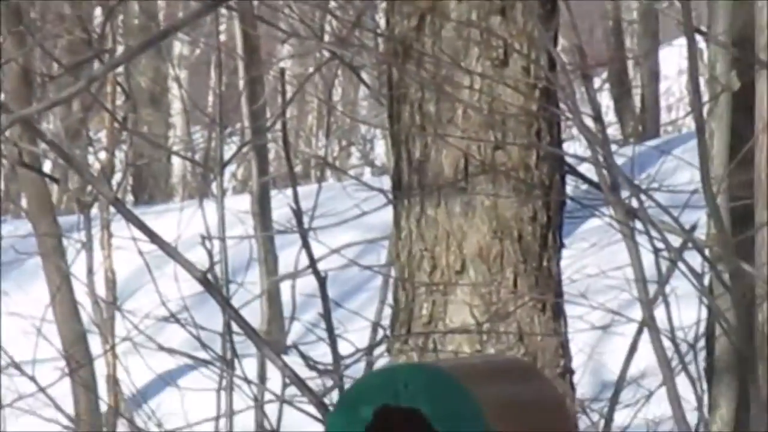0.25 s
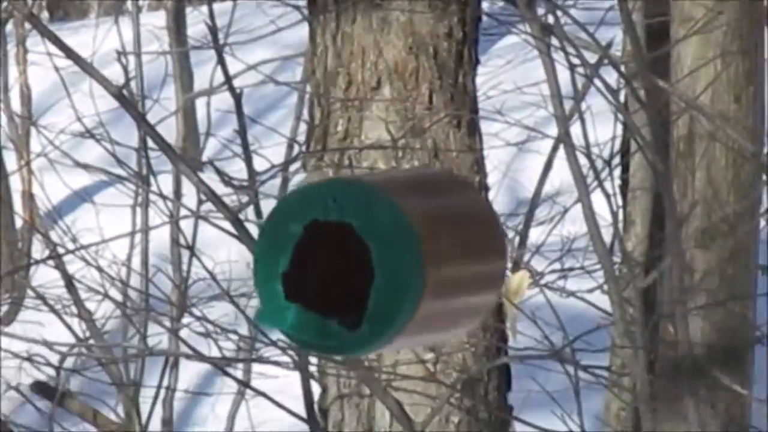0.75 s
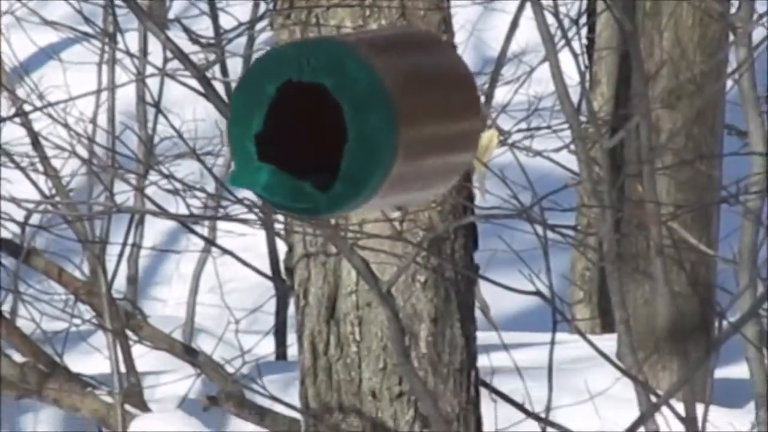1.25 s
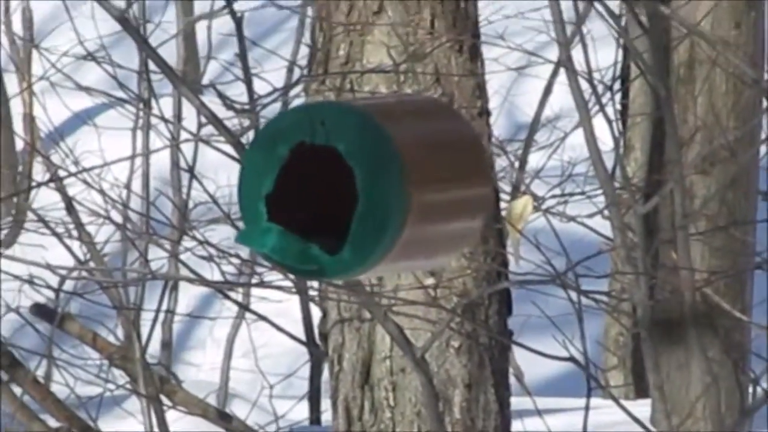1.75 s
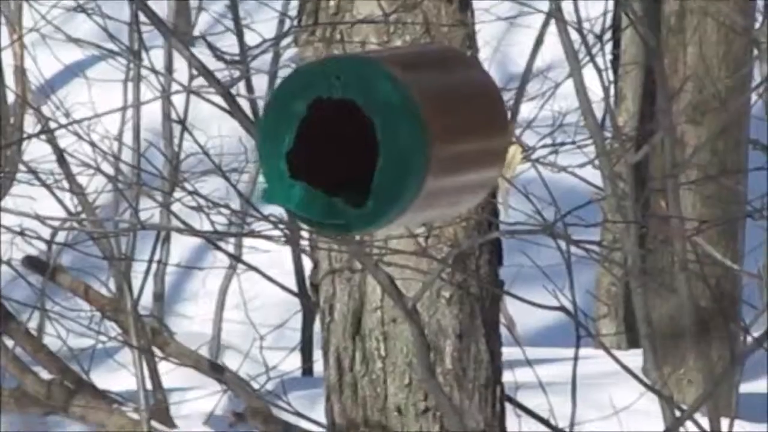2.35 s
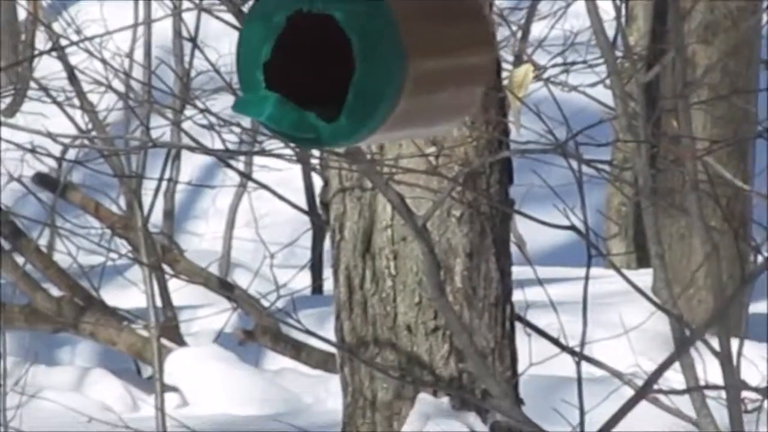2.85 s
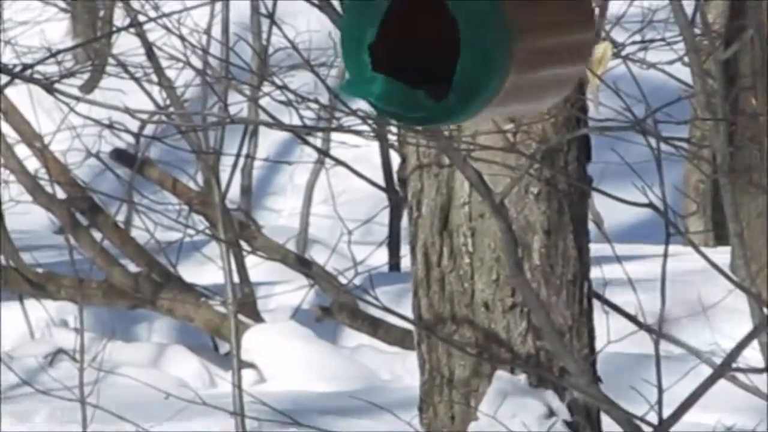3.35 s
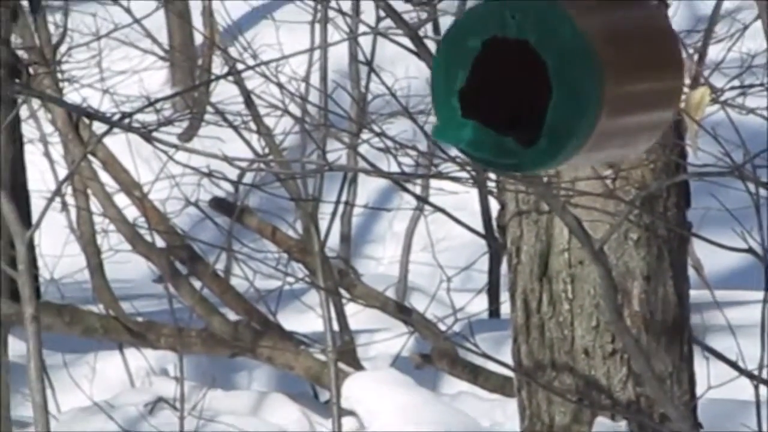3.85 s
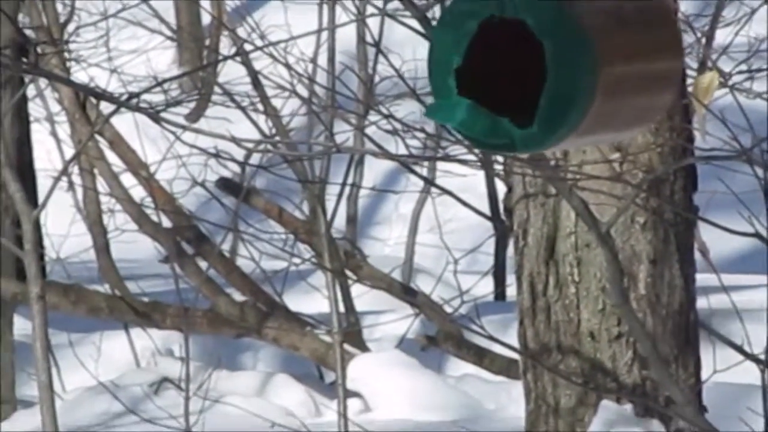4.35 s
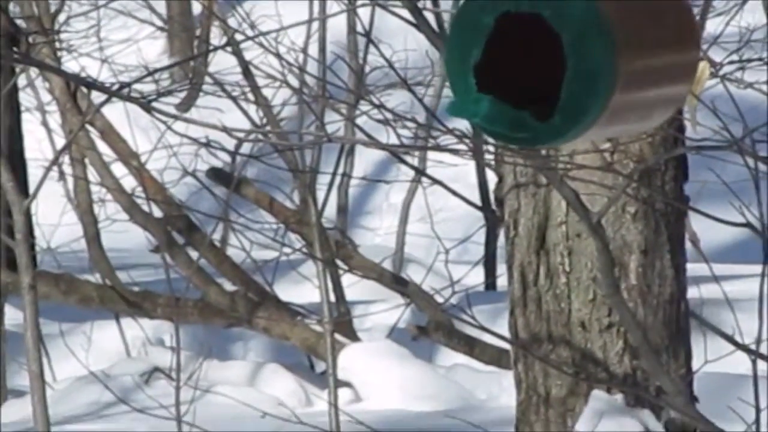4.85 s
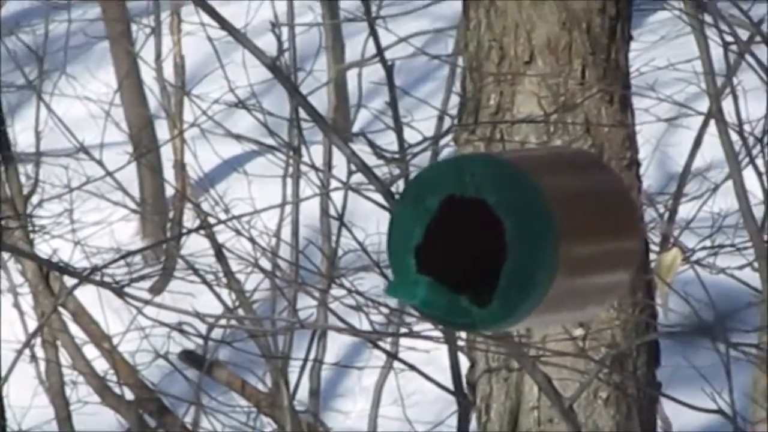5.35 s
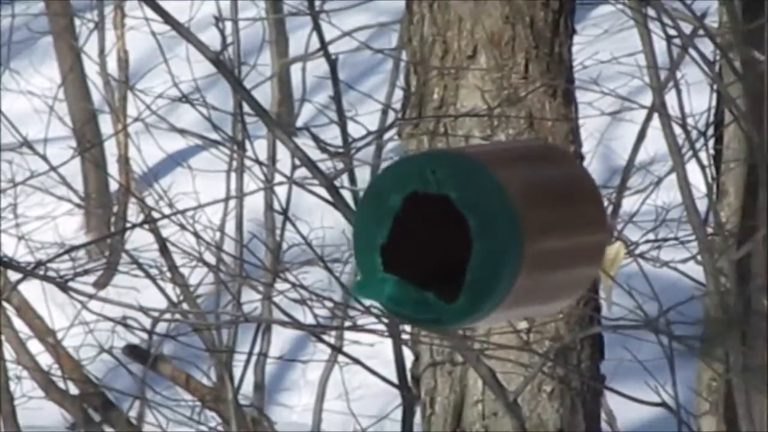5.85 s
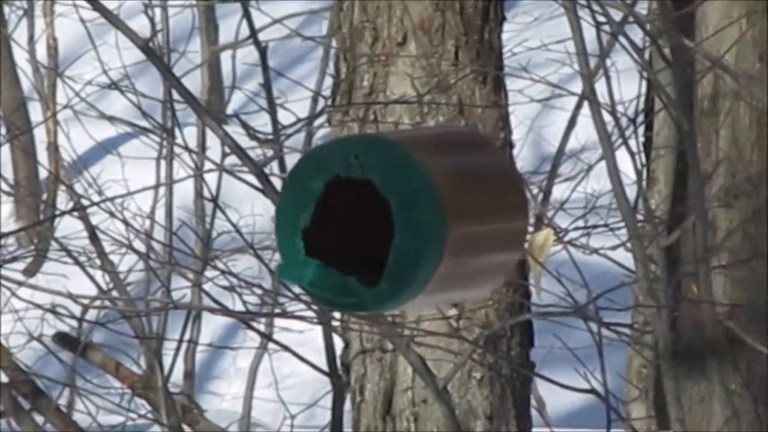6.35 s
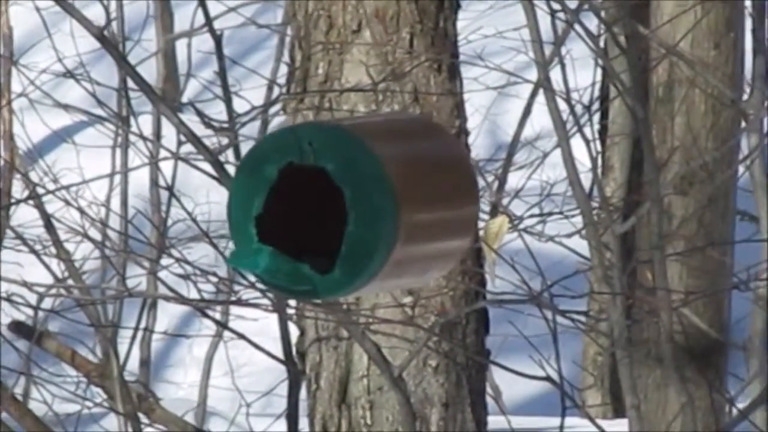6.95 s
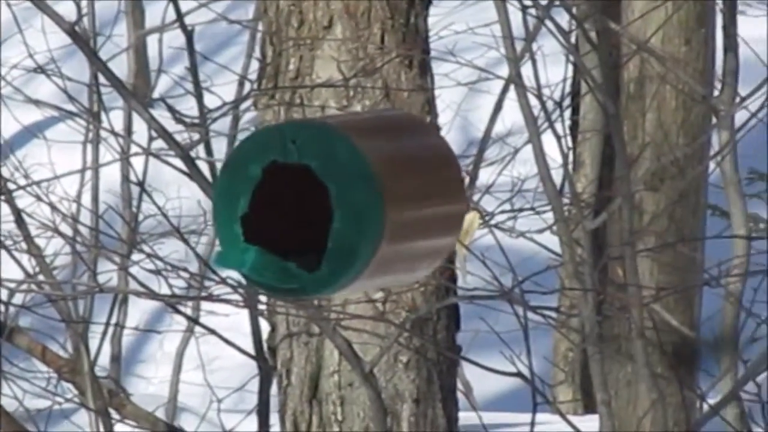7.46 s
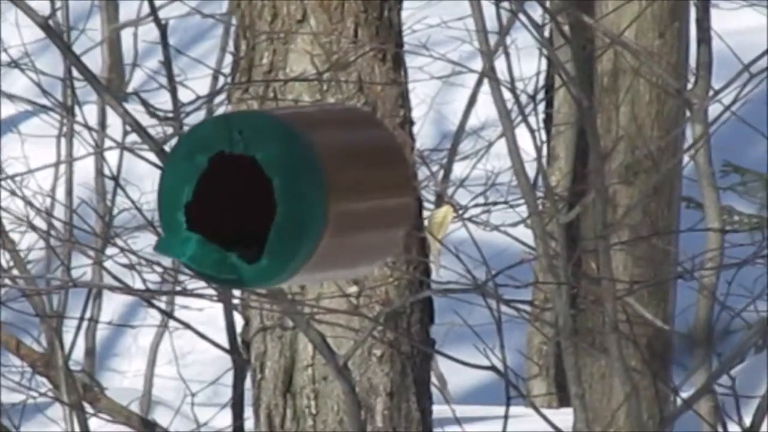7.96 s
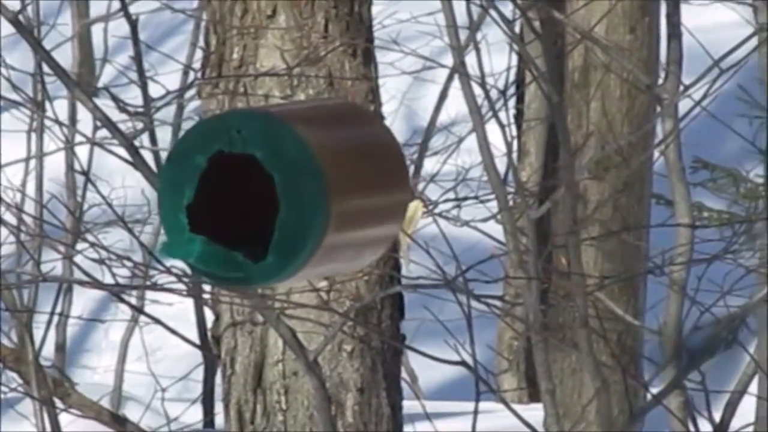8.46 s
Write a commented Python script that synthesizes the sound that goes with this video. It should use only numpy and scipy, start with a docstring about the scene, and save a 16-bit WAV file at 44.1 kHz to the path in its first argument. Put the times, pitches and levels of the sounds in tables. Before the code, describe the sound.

Close chickadees call in snowy bare woods. Six harsh rasps come quickly, then dry ticks among twigs and two weaker rasps. A thin high whistle leads into four more rasps. After faint distant chips, eight louder, cleaner buzzy dee notes follow at an even pace. Soft low hiss and small puffs of air on the microphone lie beneath, with short woody echoes.

```python
"""Chickadees in snowy woods

Harsh scolding rasps with one thin whistle among them, then a run of eight buzzy 'dee' notes.
Each note is a rising sum of wavering partials with a beak resonance; trunks scatter it. Birds further off are faint.
Dry ticks sound among the twigs; under all lie a hiss, a faint drone, a far rush and soft buffets of air."""
import sys
import numpy as np
from scipy import signal
from scipy.fft import rfft, irfft, next_fast_len
from scipy.io import wavfile

SR = 44100
rng = np.random.default_rng(int(sys.argv[2]) if len(sys.argv) > 2 else 0)


def pcm_store(signal):
    """Save signal as 16-bit PCM."""
    levels = np.round(np.clip(np.atleast_2d(signal), -1, 1) * 32767)
    wavfile.write(sys.argv[1], SR, levels.astype(np.int16).T)


N = 383669
TIME_S = np.arange(N) / SR
TOP_HZ = 15100  # highest partial and final cut

# partials of the dee voice: (multiple of the buzz rate, level [dB])
DEE_PARTIALS = [(4, -56.5), (5, -19), (6, -25.5), (7, -38), (9, -7), (10, -3.5), (11.5, -4.5),
                (13.3, -14.5), (15, -6.5), (18.5, 3), (22, -5), (26, -23.5), (31, -18), (42, -17.5)]


def undb(db):
    """Decibels to gain."""
    return 10 ** (np.asarray(db) / 20)


def unit(x):
    """Scale to rms 1."""
    return x / np.sqrt(np.mean(x ** 2))


def colour(x, points):
    """Filter by a spectrum of (frequency [Hz], level [dB]) points, joined on a log frequency axis."""
    points_hz, points_db = np.transpose(points)
    bins_hz = np.fft.rfftfreq(len(x), 1 / SR)
    gain = undb(np.interp(np.log(bins_hz + 1), np.log(points_hz), points_db))
    return irfft(rfft(x) * gain, len(x))


def resonate(x, hz, width_hz):
    """Two-pole resonance, gain 1 at the centre."""
    b, a = signal.iirpeak(hz, hz / width_hz, SR)
    return signal.lfilter(b, a, x)


def band_noise(hz, width_hz, size):
    """Noise through two equal resonances, rms 1."""
    once = resonate(rng.standard_normal(size), hz, width_hz)
    return unit(resonate(once, hz, width_hz))


def wander(rate_hz, size, count=512):
    """Normal random values at rate_hz, joined by lines."""
    return np.interp(np.arange(size) * rate_hz / SR, np.arange(count), rng.standard_normal(count))


def swells(rows):
    """Summed gain of bell-shaped swells, one per (peak [s], half width at 1/e [s], level [dB]) row."""
    return sum(undb(db) * np.exp(-((TIME_S - peak_s) / width_s) ** 2) for peak_s, width_s, db in rows)


def pan(x, pan_db):
    """Place a sound by its left minus right level."""
    return x * undb(np.array([[pan_db], [-pan_db]]) / 2)


def add(out, x, start_s):
    """Mix x into out from start_s, trimmed to fit."""
    i = int(start_s * SR)
    x = x[..., max(-i, 0):N - i]
    first = max(i, 0)
    out[..., first:first + x.shape[-1]] += x


def air_hiss():
    """Distant hiss: coloured noise whose level wavers slightly."""
    # hiss spectrum: (frequency [Hz], relative density [dB per Hz])
    hiss_spectrum = [(15, -36.5), (25, -10.5), (49, -17), (109, -17), (154, -3.5), (191, -5), (219, -2.5),
                     (326, -5.5), (363, -7), (588, -6), (1000, -13.5), (1240, -18), (2700, -29),
                     (6900, -35.5), (15000, -44)]
    level_db = -49.5 + .5 * wander(28, N)
    return undb(level_db) * unit(colour(rng.standard_normal(N), hiss_spectrum))


def air_buffets():
    """Air on the microphone: low noise in separate swells over a constant random stirring."""
    # buffets: (peak [s], half width at 1/e [s], level [dB])
    buffet_rows = [(.08, 0.018, -44), (.41, 0.032, -43.5), (.65, 0.014, -30.5), (.74, 0.047, -36),
                   (1.54, .015, -39), (3.3, 0.047, -35.5), (3.48, 0.032, -42), (3.75, 0.013, -29.5),
                   (3.85, 0.012, -32.5), (4.12, 0.022, -43.5), (4.41, 0.023, -44.5), (6.57, .025, -44),
                   (6.96, 0.074, -44), (7.95, .02, -41), (8.18, 0.056, -46), (8.66, .02, -45)]
    spectrum = [(15, -5.0), (40, -4), (90, -2.5), (170, -14.0), (400, -44.0), (2000, -67)]  # (Hz, dB)
    stir_db, stir_spread_db = -57.5, 3
    gust = swells(buffet_rows) + undb(stir_db + stir_spread_db * wander(9.1, N))
    return gust * unit(colour(rng.standard_normal(N), spectrum))


def far_drone():
    """Three narrow noise bands that throb at random; barely there, then up to a lasting level."""
    quiet_db, loud_db, rise_start_s, rise_length_s = -62.5, -52, 4.9, 0.13
    throb_db = 4.2 * wander(16, N)
    risen = np.clip((TIME_S - rise_start_s) / rise_length_s, 0, 1)
    level_db = quiet_db + (loud_db - quiet_db) * risen + throb_db
    bands = band_noise(162.3, 30, N)
    bands += undb(-10) * band_noise(228, 25, N)
    bands += undb(-9) * band_noise(335, 11.0, N)
    return undb(level_db) * bands


def far_rush():
    """Slow swells of mid-band noise."""
    # swells: (peak [s], half width at 1/e [s], level [dB])
    rush_rows = [(2.2, 0.51, -55), (7.9, 0.9, -52.5)]
    return swells(rush_rows) * band_noise(650, 400, N)


def background():
    """Hiss, buffets, drone and rush, equal in both ears, plus faint treble noise opposed between them."""
    mid = air_hiss() + air_buffets() + far_drone() + far_rush()
    side = undb(-75) * band_noise(6000, 8300, N)
    return mid + np.array([side, -side])


def ticks():
    """Dry clicks among the twigs: noise bands that die within milliseconds."""
    # ticks: (start [s], centre [Hz], level before decay [dB])
    tick_rows = [(1.588, 8400, -60), (1.707, 6710, -51), (2.474, 8060, -57), (2.57, 2770, -45),
                 (2.72, 6700, -51)]
    out, t = np.zeros(N), np.arange(SR // 30) / SR
    for start_s, hz, db in tick_rows:
        add(out, undb(db) * band_noise(hz, hz / 2, len(t)) * np.exp(-t / .003), start_s)
    return pan(out, 0)


def buzz(t, hz, rough, partials, low_db, jitter, wobble, chaos, count=44):
    """Two coupled membranes sound at multiples of their beat rate; rough coupling makes each partial waver alone."""
    size = len(t)
    unsteady = rough * (jitter * wander(300, size) + wobble * wander(45, size))
    cycles = np.cumsum(hz * (1 + unsteady)) / SR
    multiples, strengths_db = np.transpose(partials)
    voice = np.zeros(size)
    for k in range(2, count):
        top_hz = k * hz.max()
        db = np.interp(k, multiples, strengths_db) + low_db * np.clip(2 - top_hz / 2600, 0, 1)
        # low partials stay cleaner unless the note is harsh
        depth = chaos * rough * np.minimum(rough ** 2 + k / 15, 1)
        waver = wander(260, size) + 1j * wander(260, size)
        # partials out of step: each beat swells rather than clicks
        turn = np.exp(2j * np.pi * (k * cycles + .14 * rng.standard_normal()))
        voice += undb(db) * np.real(turn * (1 + depth * waver)) * (top_hz < TOP_HZ)
    return voice


def saturate(x):
    """The membranes swing only so far, which evens out the strongest beats."""
    x = unit(x)
    swing = np.abs(signal.hilbert(x, next_fast_len(len(x))))[:len(x)]
    return unit(x / (1 + (swing / 2.7) ** 4) ** .25)


def notes(rows, partials, attack_s, release_s, slack, swell_db, rough, onset_rough, jitter, wobble, chaos):
    """Notes start rough, soft and flat by the share slack, then rise, swell and clear as the membranes tighten."""
    # steep fall at the top of the voice: (frequency [Hz], level [dB])
    voice_treble = [(9400, 1.5), (10400, -11), (11600, -24.5), (15000, -34.5)]
    out = np.zeros((2, N))
    for start_s, length_s, hz, db, beak_hz, lift_db, low_db, pan_db in rows:
        t = np.arange(int((length_s + .06) * SR)) / SR
        loose = 1 - np.minimum(t / length_s, 1)
        glide_hz = hz * (1 - slack * loose ** 1.5)
        roughness = rough + onset_rough * loose ** 3
        voice = buzz(t, glide_hz, roughness, partials, low_db, jitter, wobble, chaos)
        beak = (undb(lift_db) - 1) * resonate(voice, beak_hz, 590)
        voice = colour(saturate(voice + beak), voice_treble)
        gate = (1 - np.exp(-t / attack_s)) * np.exp(-np.maximum(t - length_s, 0) / release_s)
        add(out, pan(voice * gate * undb(db - swell_db * loose), pan_db), start_s)
    return out


def far_dee():
    """A short faint dee from deeper in the wood, equal in both ears."""
    # note: (start [s], length [s], final buzz rate [Hz], final level [dB], beak resonance [Hz],
    #        beak lift [dB], low partials lift [dB], left minus right, lost in the mono mix [dB])
    far_dee_rows = [(1.405, 0.051, 322, -51.5, 5480, 5.8, 2.3, 0)]
    return notes(far_dee_rows, DEE_PARTIALS, attack_s=0.0086, release_s=.012, slack=.1, swell_db=0.5,
                 rough=.98, onset_rough=.4, jitter=.02, wobble=0.0097, chaos=0.87).mean(axis=0)


def far_birds():
    """Far dee, thin chips as unsteady gliding tones, and a squeak as noise ringing in three bands."""
    # chips: (start [s], length [s], first pitch [Hz], last pitch [Hz], level [dB])
    chip_rows = [(4.195, .06, 6400, 7400, -66.5), (4.374, 0.049, 5100, 4850, -63.5),
                 (4.982, 0.03, 8670, 6750, -46), (5.122, 0.059, 8190, 6980, -49),
                 (5.188, 0.063, 2810, 2624, -62.5)]
    # squeak bands: (centre [Hz], width [Hz], relative level [dB])
    squeak_bands = [(4420, 1200, -0.5), (6520, 430, -6), (9270, 300, -17)]
    out = far_dee()
    for start_s, length_s, first_hz, last_hz, db in chip_rows:
        size = int(length_s * SR)
        hz = np.linspace(first_hz, last_hz, size) * (1 + 0.029 * wander(497, size))
        tone = np.sin(2 * np.pi * np.cumsum(hz) / SR)
        add(out, undb(db) * unit(tone * signal.windows.tukey(size)), start_s)
    size = int(.045 * SR)
    squeak = sum(undb(db) * band_noise(hz, width_hz, size) for hz, width_hz, db in squeak_bands)
    add(out, undb(-42.5) * squeak * signal.windows.tukey(size), 8.341)
    return pan(out, 0)


def whistle():
    """One pure tone that climbs steadily, then drops ever faster in pitch as it fades."""
    start_s, length_s, attack_s = 2.952, .09, 0.018
    start_hz, climb_hz, drop_hz, drop_power = 8320, 643, 2300, 7
    level_db, fade_db, pan_db = -12, -18, -5.5
    t = np.arange(int(length_s * SR)) / SR
    progress = t / length_s
    drop = progress ** drop_power
    hz = (start_hz + climb_hz * progress - drop_hz * drop) * (1 + .002 * wander(273, len(t)))
    tone = np.sqrt(2) * np.sin(2 * np.pi * np.cumsum(hz) / SR)
    gate = (1 - np.exp(-t / attack_s)) * signal.windows.tukey(len(t), .03)
    out = np.zeros(N)
    add(out, tone * gate * undb(level_db + fade_db * drop), start_s)
    return pan(out, pan_db)


def scolding_rasps():
    """Harsh notes: rough coupling and deep chaos blur the partials."""
    # notes: (start [s], length [s], final buzz rate [Hz], final level [dB], beak resonance [Hz],
    #         beak lift [dB], low partials lift [dB], left minus right [dB])
    rasp_rows = [(-.12, .15, 421.3, -21, 6470, 8, -1, -1), (.065, .2, 454.5, -20.5, 6230, 10, -1.5, -4),
                 (.31, .19, 446.3, -18, 6470, 10, -0.5, -1), (.555, 0.17, 450.4, -19.5, 6300, 7, -4, 0),
                 (.715, 0.15, 471.6, -20, 6660, 20, 8, -2), (.988, 0.23, 468.7, -23.5, 7000, 8.5, -1.5, -4),
                 (2.171, 0.13, 469.5, -24, 5500, 26.5, 12, -4.5),
                 (2.3, 0.066, 445, -28, 5450, 21.5, 15.5, -3), (3.09, 0.18, 409.6, -25, 6580, 10, -4, 0.5),
                 (3.305, .21, 430, -22.5, 6540, 8, -7, 0.5), (3.54, .21, 438.8, -19.5, 6400, 12, -1.5, -2),
                 (3.775, .19, 442, -18, 6930, 14, -1, -2.5)]
    # partials: (multiple of the buzz rate, level [dB])
    rasp_partials = [(2, -30), (3, -27.5), (4, -9), (5, -14), (6, 0.5), (7, -1.5), (9.5, -8.5), (13, 2),
                     (16, 1.5), (19, -7.5), (22, -5), (28, -30.5)]
    return notes(rasp_rows, rasp_partials, attack_s=0.015, release_s=0.017, slack=.08, swell_db=2.5,
                 rough=.8, onset_rough=.15, jitter=.028, wobble=.012, chaos=2.1)


def dee_notes():
    """Buzzy notes: a lower beat rate and cleaner coupling, roughest at the onset."""
    # notes: (start [s], length [s], final buzz rate [Hz], final level [dB], beak resonance [Hz],
    #         beak lift [dB], low partials lift [dB], left minus right [dB])
    dee_rows = [(5.736, .16, 308.7, -15, 5740, 12.7, 4.5, -2),
                (6.015, .17, 316.6, -13.5, 5810, 15.7, 4.5, -2),
                (6.309, .16, 321.6, -13.5, 5780, 14.7, 3.5, -2.4),
                (6.649, .16, 327.4, -13, 5710, 16.5, 6, -2), (6.934, 0.14, 330.3, -12, 6070, 16, 4.5, -1.8),
                (7.243, .15, 329.6, -12.5, 5950, 12.1, 1, -1.5),
                (7.563, .16, 329.5, -13, 6010, 12.7, 0, -.5),
                (7.997, 0.13, 319.7, -14.5, 4660, 9.6, -4, -2.5)]
    return notes(dee_rows, DEE_PARTIALS, attack_s=.021, release_s=0.024, slack=.125, swell_db=2.5,
                 rough=.55, onset_rough=.5, jitter=.01, wobble=.003, chaos=.95)


def woods(x, echo_db, t60_s, tail_db, tail_t60_s, spread):
    """Trunks return many separate echoes; snow soaks up all but a late diffuse tail."""
    t = np.arange(int(.8 * SR)) / SR
    shape = (2, len(t))
    trunks = rng.standard_normal(shape) * (rng.random(shape) < 900 / SR) * (t > .004)  # 900 a second
    early = trunks * undb(-60 * t / t60_s)
    late = rng.standard_normal(shape) * undb(-60 * t / tail_t60_s) * (t > .03)
    mid, side = (undb(echo_db) * unit(early) + undb(tail_db) * unit(late)) / np.sqrt(len(t))
    response = np.array([mid + spread * side, mid - spread * side]) + (t == 0)  # plus direct sound
    response /= np.sqrt(1 + undb(2 * echo_db))  # offset the power of the echoes
    return signal.fftconvolve(x, response, axes=1)[:, :N]


def scene():
    """Near and far birds among the trees, over the background."""
    far = woods(far_birds(), echo_db=6.0, t60_s=0.33, tail_db=-13, tail_t60_s=.8, spread=0.76)
    near_dry = ticks() + whistle() + scolding_rasps() + dee_notes()
    near = woods(near_dry, echo_db=-2.5, t60_s=0.17, tail_db=-50.0, tail_t60_s=0.52, spread=0.33)
    return background() + far + near


def record(dry):
    """Closely set microphones tell direction mainly in the treble; high peaks are rounded and the top is cut."""
    # stereo width: (frequency [Hz], side level [dB])
    side_spectrum = [(1000, -16), (3000, -36), (5200, -0.5), (9000, -4)]
    mid = dry.mean(axis=0)
    side = colour((dry[0] - dry[1]) / 2, side_spectrum)
    stereo = np.array([mid + side, mid - side])
    rounded = stereo / (1 + (stereo / .85) ** 8) ** (1 / 8)
    return signal.sosfilt(signal.ellip(8, .2, 70, TOP_HZ, fs=SR, output="sos"), rounded)


dry = scene()
out = record(dry)
pcm_store(out)
```